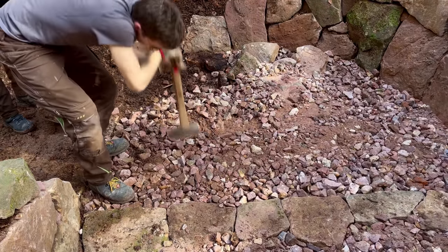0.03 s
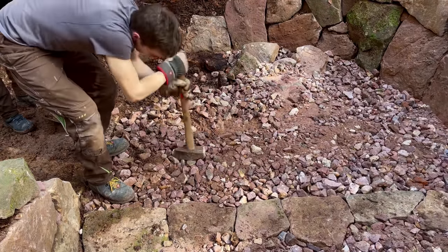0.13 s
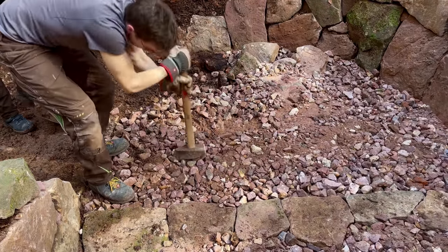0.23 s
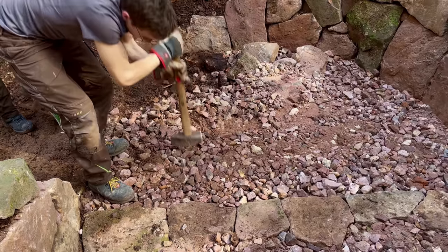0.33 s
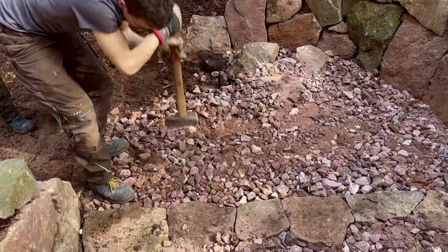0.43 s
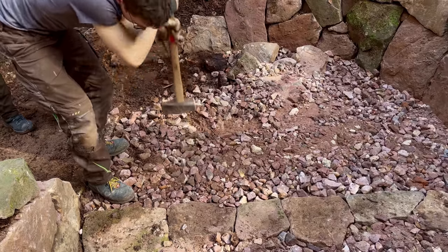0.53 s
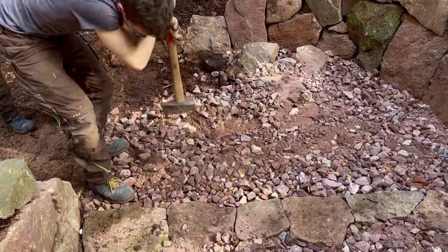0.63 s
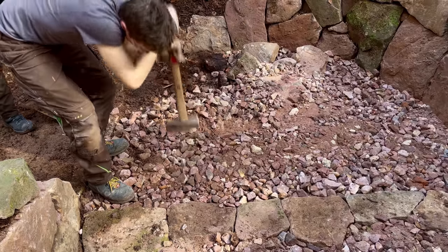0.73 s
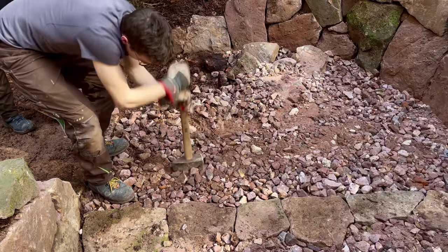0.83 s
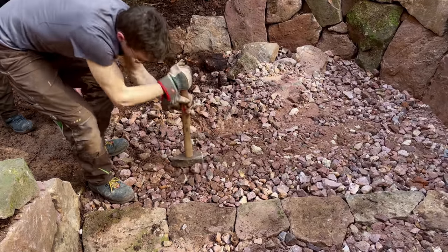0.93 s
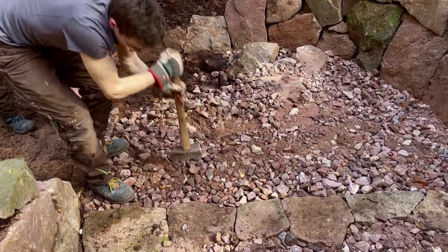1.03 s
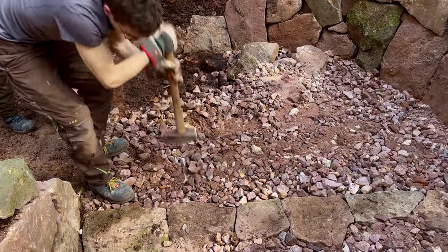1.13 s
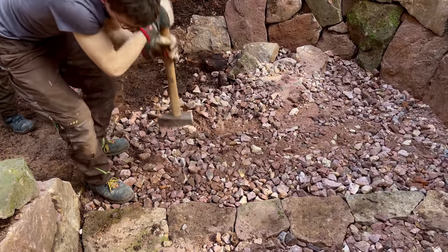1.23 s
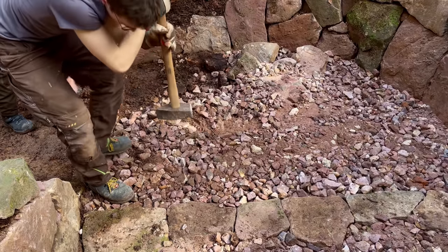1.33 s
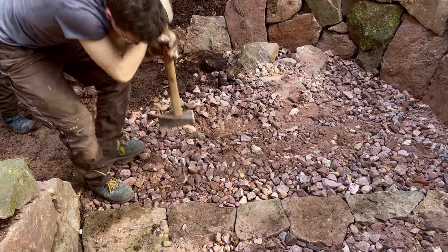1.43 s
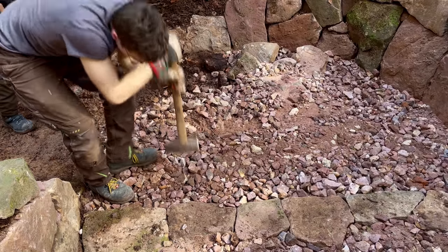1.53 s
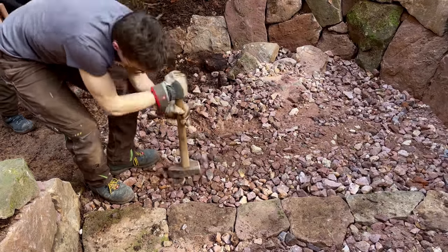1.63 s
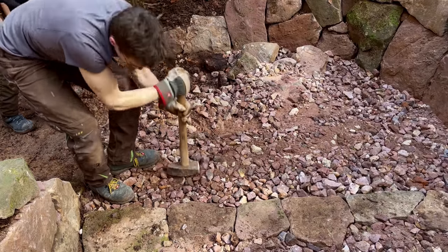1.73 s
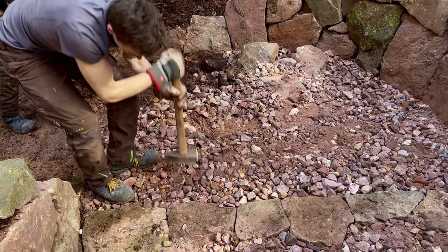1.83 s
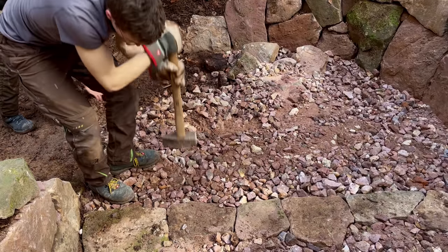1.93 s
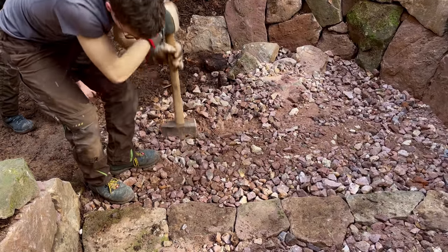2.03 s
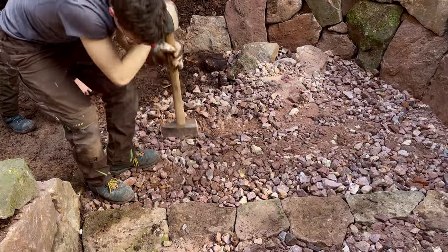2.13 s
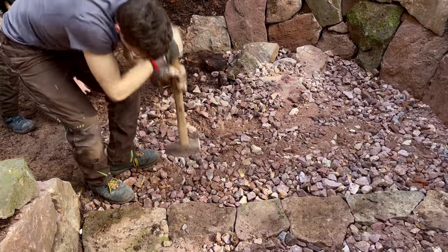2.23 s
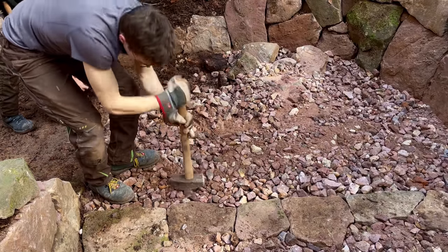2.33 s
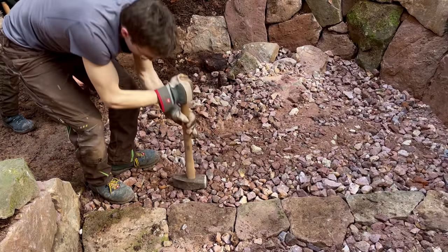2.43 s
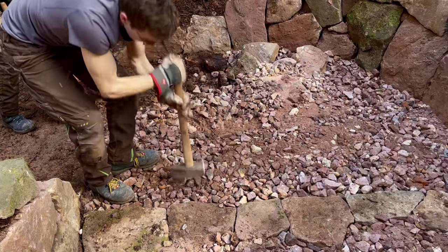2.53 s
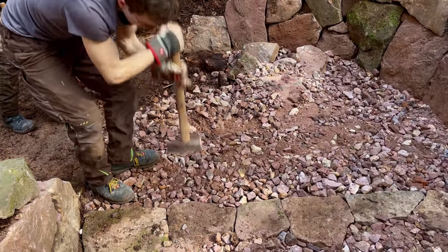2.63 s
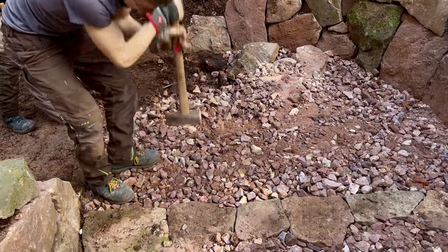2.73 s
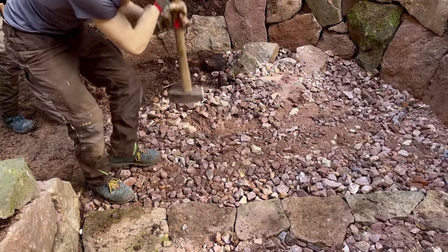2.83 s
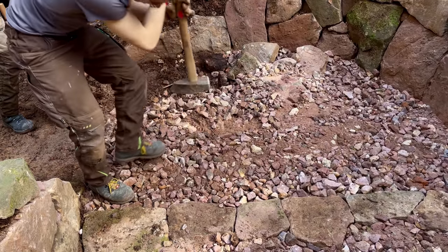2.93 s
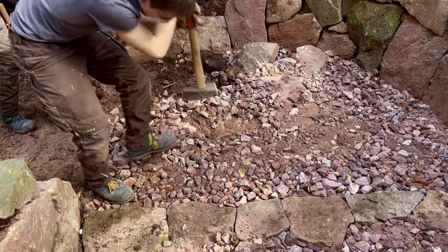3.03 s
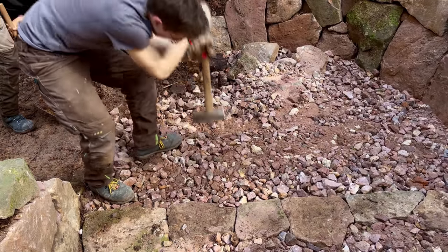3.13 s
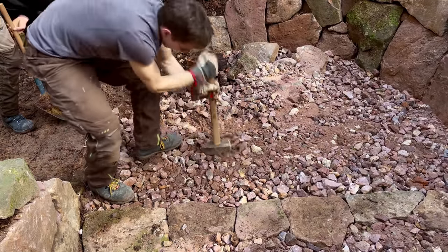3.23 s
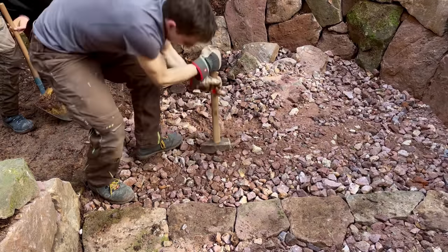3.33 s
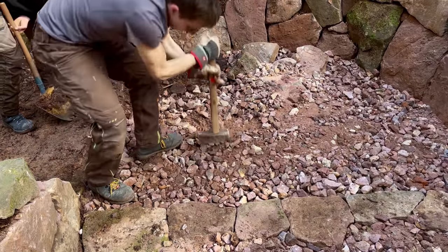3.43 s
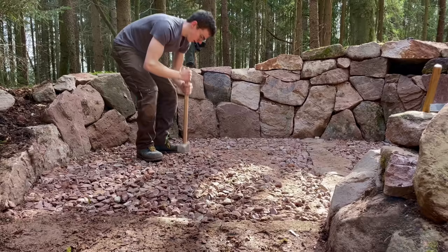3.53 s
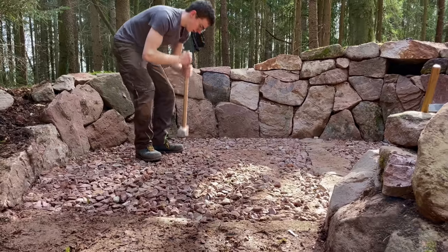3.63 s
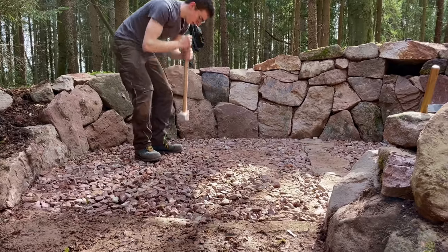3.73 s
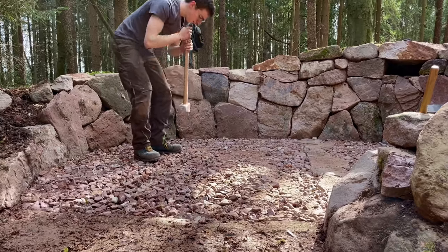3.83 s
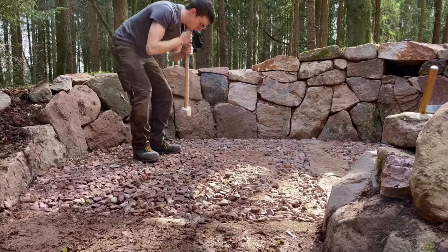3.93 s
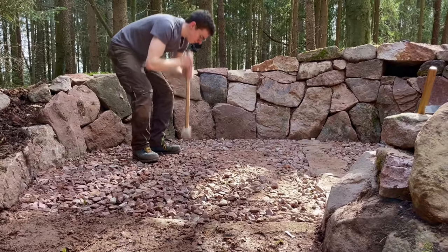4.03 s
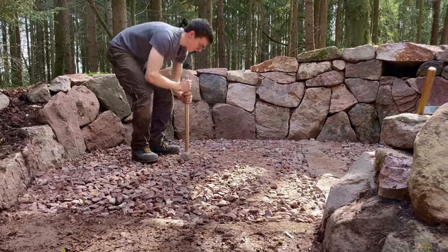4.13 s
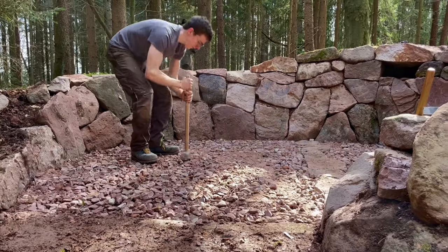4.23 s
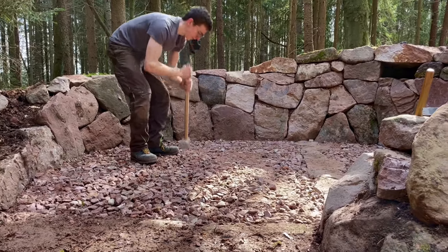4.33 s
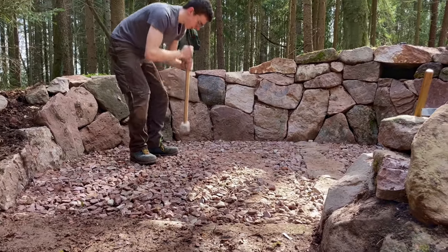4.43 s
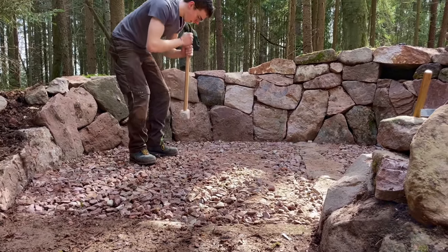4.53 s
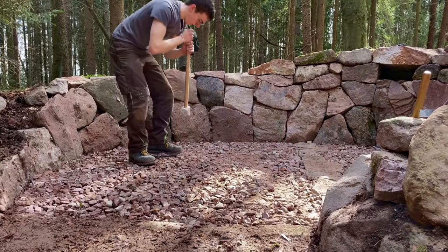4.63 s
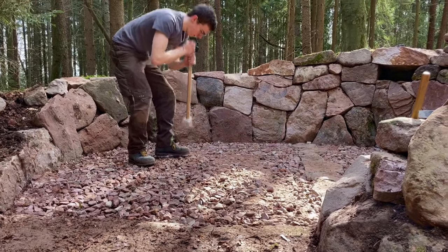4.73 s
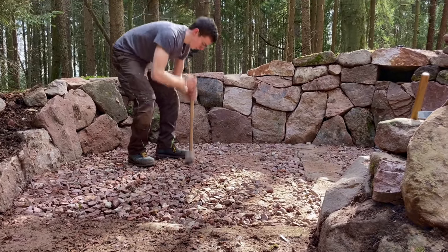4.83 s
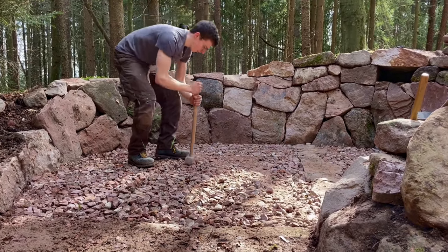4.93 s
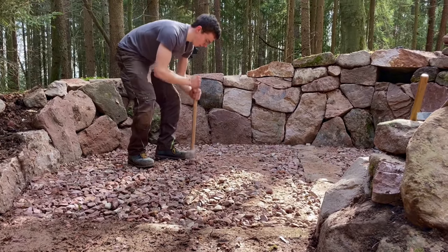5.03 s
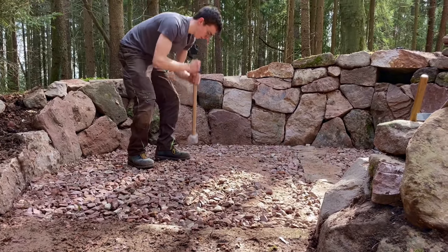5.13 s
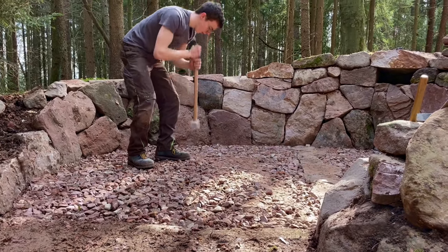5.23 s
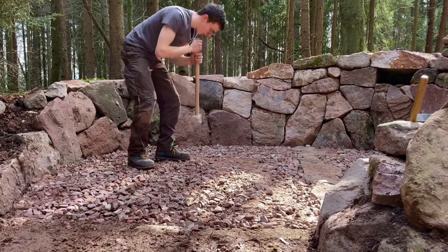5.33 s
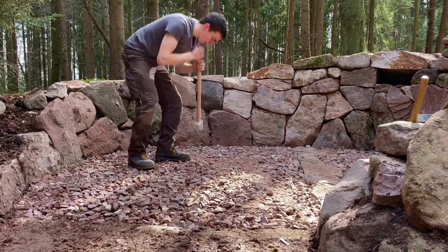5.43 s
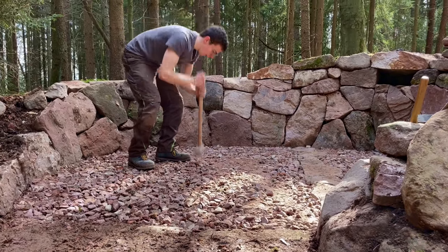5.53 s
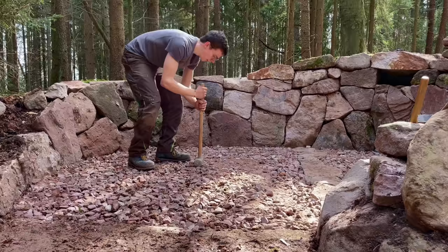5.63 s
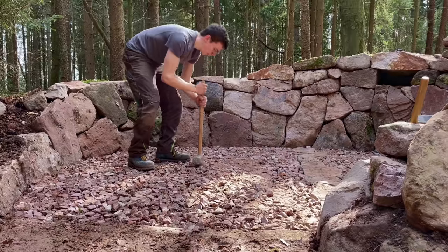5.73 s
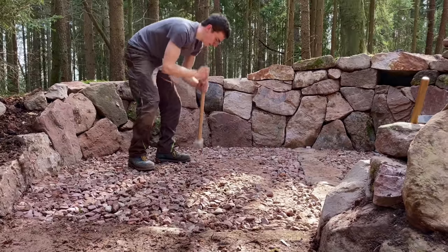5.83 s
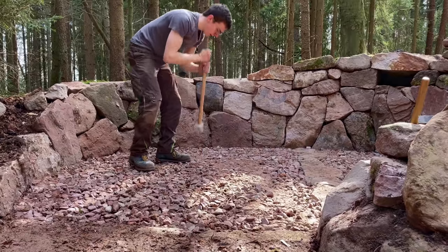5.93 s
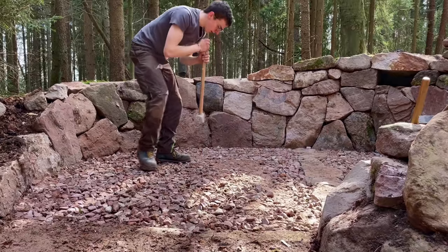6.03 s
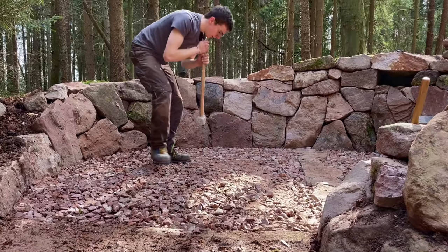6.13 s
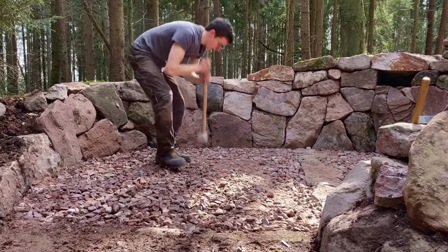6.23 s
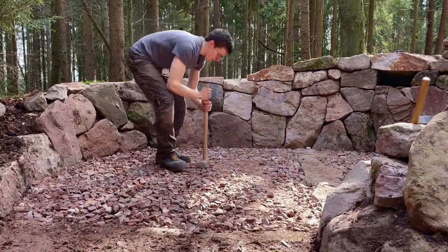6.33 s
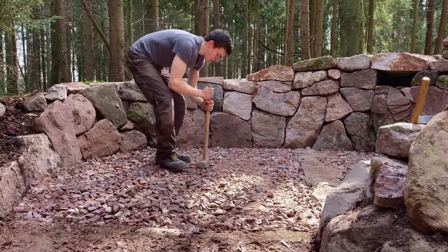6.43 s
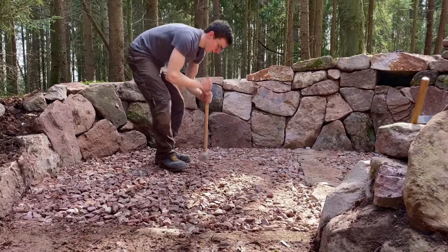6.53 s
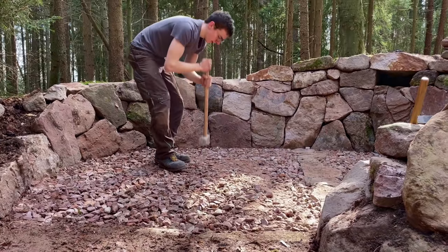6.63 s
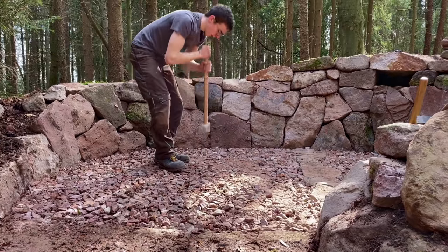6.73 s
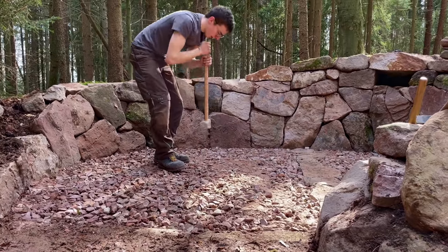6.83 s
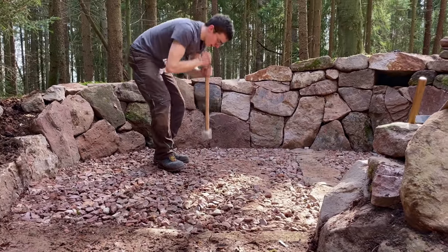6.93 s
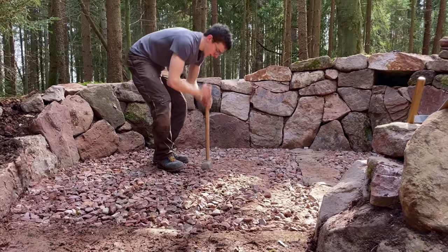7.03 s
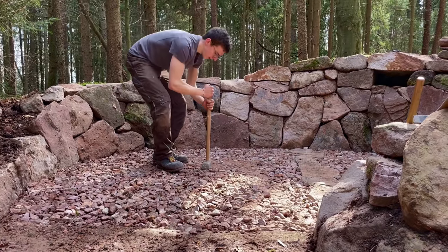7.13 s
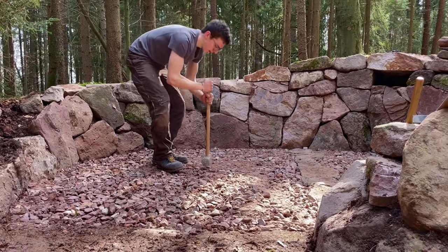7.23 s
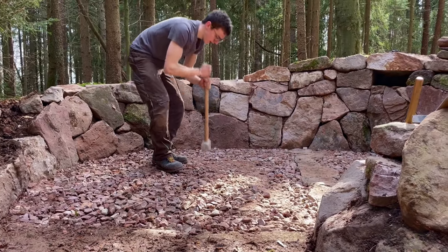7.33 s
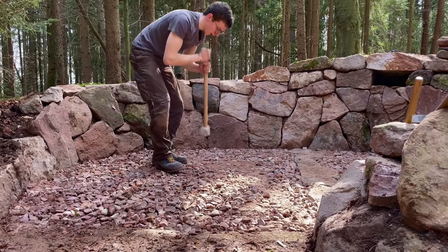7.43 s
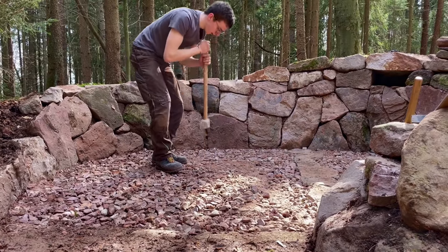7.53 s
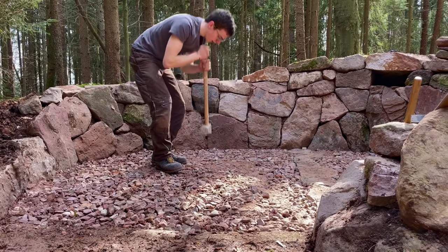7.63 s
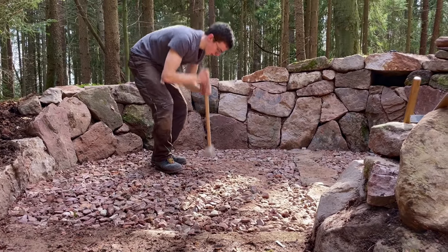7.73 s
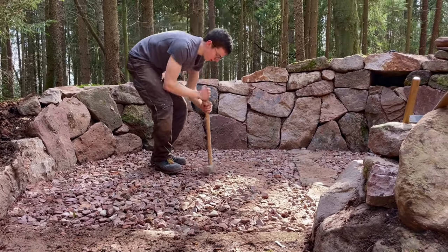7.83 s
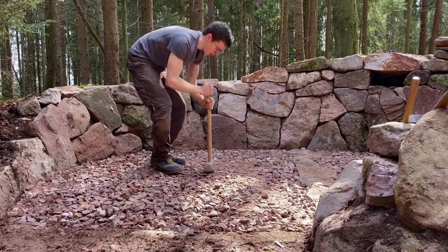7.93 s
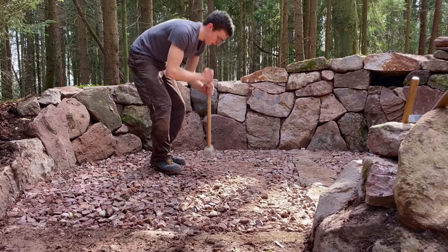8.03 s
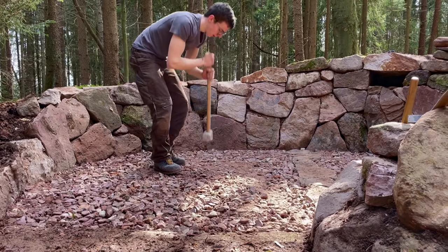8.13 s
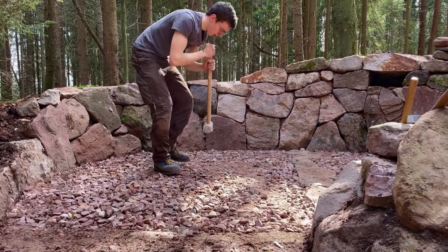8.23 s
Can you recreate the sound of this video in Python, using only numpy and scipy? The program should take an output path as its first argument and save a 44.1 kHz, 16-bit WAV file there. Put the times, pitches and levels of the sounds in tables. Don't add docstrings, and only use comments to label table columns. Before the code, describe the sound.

A quiet forest clearing inside a low stone wall. Gravel stirs briefly, then a heavy steel tamper slams into loose stones at 0.1 s, and again at about 0.9, 1.6, 2.4 and 3.3 s, close to the microphone. Each hit is a hard, bright crack of breaking stones and crushed grit, with a faint high steel ring, clearest on the second, and a deep thud near 57 Hz. Pebbles tick and clink around 0.5 s; boots scuff and thump near 1.5 and 3.1 s. A small bird chirps and whistles at 2.8-3.55 s. From about 3.6 s the blows are farther away, their bass lighter: 4.1, 4.9, 5.6, 6.3, 7.1 and 7.8 s, with boot thumps around 4.7 and 6.3 s. A faint distant bird calls at 1.3 and 7.3 s. Every blow leaves a soft, patchy, short wash from trunks and walls, over a barely audible low rumble.

```python
import sys
import numpy as np
from scipy import signal
from scipy.fft import rfft, irfft, next_fast_len
from scipy.io import wavfile
from scipy.ndimage import uniform_filter1d

SR = 44100
rng = np.random.default_rng(int(sys.argv[2]) if len(sys.argv) > 2 else 0)


def boost(x):
    u = np.asarray(x, float) / 20
    return 10 ** u


def output_pcm(signal):
    pcm = np.clip(np.atleast_2d(signal).T, -1, 1) * 32767
    wavfile.write(sys.argv[1], SR, np.round(pcm).astype(np.int16))


N = 366030
FAR_FROM_S = 3.6

# start_s, grit_brightness_db, dull_rattle_db, settling_stones_db, trees_reply_db
BLOWS = [(.130, -1, -18, -47, -45), (0.872, 1, -14, -58.5, -44), (1.634, -7, -21, -60.5, -44),
         (2.362, -2, -22.5, -66, -46), (3.257, 1.5, -18, -52, -43), (4.116, -1.5, -18.5, -56, -48),
         (4.868, -1.5, -12, -68, -45.5), (5.588, -7, -23.5, -63, -46), (6.335, -12, -21, -48, -42),
         (7.063, 0.5, -10, -71.5, -49.5), (7.808, 0.5, -29, -52, -50.5)]
# deepest_trough_s, slow_wave_db, quick_wave_lead_ms, quick_wave_db
THUDS = [(0.1593, -15.5, 14.5, -34), (0.901, -14.5, 11.6, -27.5), (1.6649, -13, 17.4, -18),
         (2.389, -15, 10.4, -11.5), (3.288, -13, 18.5, -22), (4.1463, -20.5, 12.8, -21),
         (4.899, -19, 11, -15), (5.619, -20, 12.7, -18), (6.3653, -20.5, 12.9, -17),
         (7.0931, -20, 13.3, -23), (7.8381, -19.5, 13, -23.5)]
# frequency_hz, density_db (per Hz)
DULL = [(53, -32.5), (90, -2.5), (319, -3), (568, -5.5), (768, -10), (1160, -17), (1530, -18), (1800, -24),
        (2340, -49.5), (3960, -120)]


def at_hz(points, hz):
    points = np.array(points, float)
    return np.interp(np.log(hz + 1), np.log(points[:, 0] + 1), points[:, 1])


def coloured(x, spectrum):
    size = next_fast_len(x.shape[-1] + 4096)
    gain = boost(at_hz(spectrum, np.fft.rfftfreq(size, 1 / SR)))
    gain = gain / np.sqrt(np.mean(gain ** 2))
    return irfft(rfft(x, size) * gain, size)[..., :x.shape[-1]]


def add(track, s, piece):
    k = max(round(s * SR), 0)
    track[k:k + len(piece)] += piece[:N - k]


def drift(rate):
    slow = uniform_filter1d(rng.standard_normal(N // 64 + 2), max(int(SR / 128 / rate), 1))
    return np.interp(np.arange(N) / 64, np.arange(len(slow)), slow / slow.std())


def grains(per_s, spread_db, alike):
    hits = rng.random(N) < per_s / SR
    sizes = boost(spread_db * np.minimum(rng.exponential(1, N), 4)) * hits
    mid, side = rng.standard_normal((2, N)) * (1 + sizes)
    side = signal.lfilter(*signal.butter(2, 5000, fs=SR), side)
    alike = np.clip(alike, 0, 1)
    out = np.sqrt(1 + alike) * mid + np.sqrt(1 - alike) * side * [[1], [-1]]
    return out / out.std()


def stones(per_s, spread_db, cycles, hiss, alike):
    hits = rng.random(N) < per_s / SR
    sizes = boost(spread_db * np.minimum(rng.exponential(1, N), 3))
    clicks = sizes * hits * rng.choice([-1, 1], N)
    pitches, dealt = np.geomspace(500, 15000, 18), rng.integers(0, 18, N)
    out = 0
    for k, hz in enumerate(pitches):
        r, w = boost(-60 * hz / (cycles * SR)), 2 * np.pi * hz / SR
        rung = signal.lfilter([1, 0, -1], [1, -2 * r * np.cos(w), r * r], clicks * (dealt == k) + 1e-18)
        out = out + rung / rung.std() * np.sqrt(hz)
    out = out / out.std() + hiss * grains(0, 0, alike)
    return out / out.std()


def rumble():
    # frequency_hz, density_db (per Hz)
    lows = [(12, -49), (20, -24.5), (46, 6), (70, 3.5), (107, -2), (264, -25.5), (289, -33.5), (400, -23),
            (520, -49), (880, -120)]
    tremble_db, tremble_t60_s = -38, 1.9
    level, t = boost(-70 + 3 * drift(2.8)), np.arange(SR) / SR
    for s, slow_db, *_ in THUDS:
        tremble = boost(slow_db + tremble_db - 60 * t / tremble_t60_s)
        add(level, s, tremble * np.minimum(t / .03, 1))
    return level * coloured(grains(0, 0, 0.97), lows)


def shifting():
    # dull_db, gritty_db
    rest = [
        (-70, -84),
        (-71.5, -86),
    ]
    # start_s, length_s, dull_db, gritty_db
    shifts = [(.0, 0.59, -72, -76.5), (0.619, 0.18, -71, -69), (0.91, 0.34, -66.5, -66),
              (1.203, 0.64, -62, -70.5), (1.699, 0.3, -73, -74.5), (2.552, .3, -73.5, -68),
              (2.838, 0.281, -74, -73), (3.088, 0.35, -62.5, -64), (3.22, 0.336, -66, -59.5),
              (4.205, 0.32, -83.5, -75.5), (4.67, 0.22, -61.5, -67), (5.05, 0.16, -72.5, -79.5),
              (5.756, 0.24, -69.5, -67.5), (6.7, 0.094, -92, -71), (7.249, 0.34, -83, -93),
              (7.948, 0.22, -84, -77.5)]
    rise_s, fall_s = .07, .04
    lean_s, lean_dull_db, lean_grit_db = .12, -66, -67.5
    settle_t60_s, settle_dull_db = 0.53, -4
    t = np.arange(SR) / SR
    spot = (np.arange(N) > FAR_FROM_S * SR).astype(int)
    dull, grit = boost(np.transpose(rest))[:, spot]
    leans = [(s - lean_s, lean_s, lean_dull_db, lean_grit_db) for s, *_ in BLOWS]
    for s, length, dull_db, grit_db in [*shifts, *leans]:
        shape = np.clip(np.minimum(t / rise_s, (length - t) / fall_s + 1), 0, 1) ** 2
        add(dull, s, boost(dull_db) * shape)
        add(grit, s, boost(grit_db) * shape)
    for s, _, _, settle_db, _ in BLOWS:
        settle = boost(settle_db - 60 * t / settle_t60_s)
        add(dull, s, boost(settle_dull_db) * settle)
        add(grit, s, settle)
    return dull, grit


def gravel():
    # frequency_hz, density_db (per Hz)
    grit_colour = [(350, -41.5), (600, 0), (1580, -5.5), (2100, -2), (5300, -6.5), (7000, -10.5),
                   (8200, -7.5), (11200, -11), (14500, -11.5), (16300, -18.5), (17000, -33)]
    # start_s, dull_db, gritty_db, length_s, knock_pitch_hz
    boots = [(1.058, -42.5, -57, 0.0095, 338), (1.458, -40, -58, 0.0067, 389), (1.561, -42, -56, .05, 272),
             (2.425, -45, -35, 0.03, 400), (3.138, -44, -49, 0.0076, 252), (3.15, -47, -48.5, 0.03, 246),
             (3.212, -59, -49, 0.18, 743), (3.37, -48, -43, 0.013, 250), (3.383, -45, -38.5, 0.012, 252),
             (3.506, -57, -37, 0.0035, 400), (3.525, -40.5, -68, 0.0067, 222),
             (3.646, -49.5, -61, 0.028, 301), (4.481, -45.5, -71, .014, 330), (4.709, -54, -58, .014, 503),
             (4.718, -50, -58.5, 0.023, 477), (4.791, -47, -63, 0.019, 376),
             (5.513, -57.5, -64.5, 0.049, 348), (5.971, -54, -51.5, 0.045, 283),
             (6.275, -45, -54.5, 0.15, 400)]
    # start_s, grit_db, pitch_hz, length_s, stone_over_grit_db
    pebbles = [(0.517, -47.5, 4040, 0.04, -3), (0.53, -49, 5200, 0.03, 3), (0.61, -60.5, 2220, 0.013, -1),
               (0.639, -73, 10000, 0.032, 17), (1.131, -63, 5780, .008, 9), (1.154, -49, 1210, 0.011, -2.5),
               (1.197, -54, 5600, 0.0092, -3), (1.222, -56, 6000, 0.0068, -3),
               (1.772, -60, 1480, 0.0067, 18), (2.351, -50, 2790, .03, 9.5), (2.45, -53.5, 5240, .012, 2),
               (2.678, -57, 3000, 0.17, -6), (3.457, -29, 2290, 0.0027, 7.5),
               (3.638, -54.5, 2480, 0.0081, 11.5), (4.475, -52.5, 2200, 0.0083, 4),
               (5.912, -63.5, 5320, 0.064, -0.5), (6.576, -51.5, 11000, 0.0087, -6.5)]
    # start_s, level_db
    ticks = [(0.183, -41), (.230, -43), (0.299, -55), (0.334, -50.5), (0.443, -64), (1.262, -69.5),
             (1.503, -73), (1.531, -56), (1.617, -44), (1.865, -59.5), (1.921, -56), (1.938, -65),
             (2.414, -41.5), (2.511, -47.5), (3.026, -54), (3.082, -65), (3.112, -60), (3.352, -46),
             (3.487, -50), (3.568, -54.5), (5.164, -69), (5.82, -56), (6.547, -62), (8.108, -63)]
    # start_s, level_db, pitch_hz, t60_s
    clinks = [(.517, -42.5, 1140, 0.066), (.519, -44, 673, 0.056), (.517, -44, 3250, .07),
              (.517, -44, 4700, .04), (.518, -47, 5720, .03), (7.8082, -8.5, 2210, 0.0092),
              (7.8080, -7, 5150, .004), (7.8075, -20.5, 680, .012), (3.203, -43, 870, 0.043),
              (4.476, -57.5, 3800, 0.033), (4.476, -57.5, 2900, .03), (4.8695, -15.5, 549, .015),
              (7.0705, -20, 1300, .015), (7.076, -26, 2200, .012), (6.3350, -9, 3300, .012),
              (6.337, -10, 1870, .012), (6.341, -14, 1000, .01), (4.1155, -17, 4020, .014),
              (4.1150, -15, 3000, .007), (4.1185, -14, 1150, .012), (4.123, -20, 2000, .012),
              (4.868, -13, 4090, .008), (5.589, -11, 4500, .006), (0.124, -15, 560, .014)]
    # start_s, level_db, pitch_hz, t60_s
    thumps = [(1.5605, -24, 360, .035), (1.568, -25, 290, .05), (1.570, -27, 110, .09),
              (1.585, -32, 420, .03), (3.1375, -33, 330, .04), (3.142, -29, 250, .07),
              (3.146, -25, 105, .09), (3.224, -40, 420, .03), (3.200, -38, 90, .09), (4.708, -37, 170, .06),
              (4.7185, -36, 620, .03), (4.7235, -33, 300, .035), (4.731, -38, 90, .1),
              (4.753, -41, 200, .07), (4.7905, -31, 410, .03), (4.794, -35, 150, .1),
              (4.801, -39, 520, .03), (6.2725, -30, 380, .03), (6.287, -27, 300, .045),
              (6.296, -28, 150, .07), (6.310, -27, 330, .04), (6.313, -33, 800, .03)]
    pebble_dull_db = -17
    sole_db, sole_rise_s, sole_t60_s = 3, .004, .045
    sole_start, sole_sink_s = 1.1, .005

    dull, grit = shifting()
    grit = grit * boost(2.4 * drift(13))
    tone, t = np.zeros(N), np.arange(SR // 3) / SR
    scuffs = [(s, db + pebble_dull_db, db, hz, db + stone_db, length) for s, db, hz, length, stone_db in pebbles]
    scuffs += [(s, low_db, high_db, hz, low_db - 4.5, length) for s, low_db, high_db, length, hz in boots]
    for s, low_db, high_db, hz, tone_db, length in scuffs:
        fade = np.exp(-t / np.clip(length, .002, .1) * 2) * np.minimum(t / 0.0012, 1)
        add(dull, s, boost(low_db - 4) * fade * np.minimum(t / 0.0034, 1))
        add(grit, s, boost(high_db - 2.0) * fade)
        band = signal.butter(1, [hz / 1.3, hz * 1.3], "band", fs=SR)
        stone = signal.lfilter(*band, rng.standard_normal(len(t)))
        add(tone, s, boost(tone_db) * fade * stone / stone.std())

    sinking = t + sole_start * sole_sink_s * (1 - np.exp(-t / sole_sink_s))
    for s, low_db, *_, hz in boots:
        fade = boost(low_db + sole_db - 60 * t / sole_t60_s) * np.minimum(t / sole_rise_s, 1)
        add(tone, s, fade * np.sin(2 * np.pi * hz * sinking))
    for s, db, hz, t60 in [*clinks, *thumps]:
        fade = boost(db - 60 * t / t60) * np.minimum(t * hz, 1)
        add(tone, s, fade * np.sin(2 * np.pi * hz * t))
    for s, db in ticks:
        add(grit, s, boost(db - 60 * t / 0.012))
    dull_bed = dull * coloured(grains(130, 3, 0.61), DULL)
    return dull_bed + grit * coloured(stones(2500, 5, 13, 1.0, 0.2), grit_colour) + tone


def cracks():
    # start_s, peak_db, pitch_hz, crushed_grit_against_peak_db
    breaks = [(0.1116, -40, 2094, -7), (0.1221, -12, 2300, -11), (0.1223, -9, 950, -16),
              (0.1299, -5, 2598, -11.5), (0.1303, -4, 759, -20), (0.1333, -15, 2997, -10),
              (.1475, -26, 950, -14), (.158, -26.5, 5010, -24.5), (0.859, -41, 2003, -9.5),
              (0.8696, -5, 2250, -14), (0.8713, -8.5, 2753, -14.5), (0.8722, -10, 3950, -12.5),
              (0.8708, -12, 5100, -14), (.8835, -22, 3906, -12), (1.63, -8.5, 1850, -11),
              (1.6311, -12, 683, -16), (1.6342, -10.5, 1750, -12.5), (1.6352, -1.5, 4500, -13),
              (1.6362, -9, 2700, -14), (1.634, -9.5, 5680, -14.5), (2.3571, -13, 2900, -10.5),
              (2.3595, -6.5, 2110, -14), (2.3600, -4.5, 963, -18), (2.3606, -3.5, 1395, -16.5),
              (2.3640, -9, 1300, -16), (2.3660, -8.5, 1945, -13), (3.2505, -7.5, 4800, -10),
              (3.2523, -14, 1180, -12), (3.2578, -2, 2000, -20.5), (3.2576, -10, 880, -18),
              (3.2607, -9.5, 2607, -16), (3.2660, -16.5, 1894, -11.5), (4.1156, -11, 1950, -10),
              (4.1172, -12, 740, -14), (4.8676, -4.5, 2600, -15), (4.8685, -8.5, 1440, -17),
              (4.8700, -7, 3080, -14), (4.8765, -20, 1326, -14.5), (4.8775, -19, 2294, -12.5),
              (5.5886, -0.5, 2630, -11.5), (5.5940, -12, 1322, -20.5), (5.5958, -14, 2310, -14),
              (6.3347, -4, 2190, -9), (6.3344, -4, 1570, -14), (7.0611, -16, 6600, -6.5),
              (7.0618, -16.5, 3960, -9.5), (7.0640, -17, 2420, -11.5), (7.0650, -15, 880, -12.5),
              (7.8039, -19.5, 5310, -7), (7.8082, -4, 3940, -14)]
    # frequency_hz, density_db (per Hz)
    crush = [(120, -22.5), (200, -7), (630, -5.5), (1200, -6), (3400, -6), (6200, -10.5), (8000, -12),
             (11600, -19), (14500, -22), (16300, -29.5), (17000, -54)]
    bite_s = .002
    snaps, spray, dust, rattle = np.zeros((4, N))
    t = np.arange(SR // 5) / SR
    bite = np.minimum(t / bite_s, 1)
    for s, db, hz, crush_db in breaks:
        _, bright_db, rattle_db, *_ = min(BLOWS, key=lambda blow: abs(blow[0] - s))
        fade = np.minimum(t * hz, 1) * boost(1.5 - 60 * t * hz / 10)
        add(snaps, s, boost(db + 4.0) * np.sin(2 * np.pi * hz * t) * fade)
        grit_db = db + crush_db
        add(spray, s - bite_s, boost(grit_db + 2.5 - 60 * t / 0.035) * bite ** 2.7)
        add(dust, s - bite_s, boost(grit_db + bright_db + 2.0 - 60 * t / 0.033) * bite ** 2.5)
        add(rattle, s, boost(grit_db + rattle_db - 60 * t / .1))
    grit = stones(5000, 4, 9.9, 0.53, 0.99)
    body = signal.sosfilt(signal.butter(2, 4500, fs=SR, output="sos"), grit)
    crushed = coloured(spray * body + dust * (grit - body), crush)
    return snaps + crushed + coloured(rattle * grains(500, 3.5, 0.97), DULL)


def steel():
    # pitch_hz, t60_s
    modes = [(7741, .07), (8522, .25), (9232, .08), (12370, .25), (15330, .12)]
    # start_s, then level_db of the four lower modes
    rings = [(0.131, -66, -35.5, -35.5, -61), (.871, -47.5, -24, -40, -64),
             (1.634, -60.5, -63.5, -49, -39.5), (2.362, -46, -45.5, -48.5, -67.5),
             (3.256, -75.5, -64.5, -51.5, -69.5), (4.115, -68.5, -63, -71, -61),
             (4.869, -76.5, -51, -66, -53), (5.589, -39.5, -43, -49, -43.5),
             (6.334, -36.5, -41.5, -73, -61), (7.063, -58.5, -68, -60.5, -51), (7.808, -52, -58, -64, -50)]
    out, t = np.zeros(N), np.arange(SR // 2) / SR
    for s, *levels_db in rings:
        levels_db = [*levels_db, levels_db[2] - 9.5]
        for db, (hz, t60) in zip(levels_db, modes):
            add(out, s, boost(db - 60 * t / t60) * np.sin(2 * np.pi * hz * t))
    return out


def thuds():
    # slow_hz, glide_hz_per_s, crest_after_trough_s, spread_s, quick_hz, quick_spread_s
    ground = [
        (57.3, -300, -0.012, 0.027, 125, 0.0042),
        (57, 30.5, 0.0019, 0.039, 130.5, 0.0049),
    ]
    # start_s, level_db, pitch_hz
    knocks = [(0.134, -31, 263), (0.872, -16, 300), (1.6387, -14, 225), (2.368, -21.5, 190),
              (3.259, -16.5, 270), (4.118, -21.5, 375), (4.872, -18.5, 260), (5.591, -22.5, 203),
              (6.335, -23.5, 226), (7.067, -25.5, 220), (7.813, -35.5, 190)]
    late_s, rise_s = 0.0052, .010
    knock_start, knock_sink_s = .4, 0.0033
    start, early = .03, 0.015
    out, t = np.zeros(N), np.arange(SR // 4) / SR
    after = t - start
    for s, slow_db, lead_ms, quick_db in THUDS:
        hz, glide, crest, spread, quick_hz, quick_spread = ground[int(s > FAR_FROM_S)]
        u = np.minimum(after, .06)
        turns = hz * after + glide * (u * after - u ** 2 / 2)
        hump = np.exp(-((after - crest) / spread) ** 2) + 0.37 * np.exp(-t / (0.69 * spread))
        swell = np.clip((t - late_s) / rise_s, 0, 1) ** 2 * hump
        add(out, s - start, -boost(slow_db) * swell * np.cos(2 * np.pi * turns))
        add(out, s - start, boost(slow_db - 9.5) * swell * np.sin(2 * np.pi * 36 * after))
        quick = (t / early) ** 2 * np.exp(-(t - early) / quick_spread)
        quick = quick * np.cos(2 * np.pi * quick_hz * (t - early))
        add(out, s - lead_ms / 1000 - early, boost(quick_db) * quick)
    sinking = t + knock_start * knock_sink_s * (1 - np.exp(-t / knock_sink_s))
    for s, db, hz in knocks:
        fade = np.minimum(t * hz, 1) * boost(-60 * t * hz / 7.0)
        add(out, s, boost(db + 9) * np.sin(2 * np.pi * hz * sinking) * fade)
    return out


def trees():
    # centre_hz, t60_s, level_db
    bands = [(200, 0.99, -16), (400, 0.56, -11), (800, 0.31, -2.5), (1760, .8, -6.5), (3260, 0.6, -4),
             (6000, 0.52, -8.5), (11000, 0.25, -13)]
    blows, out = np.zeros(N), 0
    for s, *_, reply_db in BLOWS:
        blows[round((s + .008) * SR)] = boost(reply_db)
    white = [grains(0, 0, 0.39), grains(0, 0, 0.34)]
    clumps = drift(45)
    rise = np.exp(-1 / (0.0035 * SR))
    for k, (hz, t60, db) in enumerate(bands):
        sos = signal.butter(2, [hz / 1.45, hz * 1.45], "band", fs=SR, output="sos")
        band = signal.sosfilt(sos, white[k % 2])
        poles = np.convolve([1, -rise], [1, -boost(-60 / (t60 * SR))])
        fade = signal.lfilter([1 - rise], poles, blows + 1e-18)
        patchy_db = 1.4 * drift(30) + 1.5 * drift(6) + 0.8 * clumps
        out = out + band / band.std() * boost(db + patchy_db) * fade
    return out


def echo(blows):
    t = np.arange(SR * 3 // 4) / SR
    fade = boost(-65 - 60 * t / .7) * np.clip(t / .02 - .4, 0, 1)
    mid, side = rng.standard_normal((2, len(t))) * fade
    sos = signal.butter(1, (560, 6000), "band", fs=SR, output="sos")
    cloud = signal.sosfilt(sos, mid + .4 * side * [[1], [-1]])
    return signal.fftconvolve(blows.mean(axis=0, keepdims=True), cloud, axes=1)[:, :N]


def bird():
    # time_s, pitch_hz, level_db
    near_notes = [
        [(2.803, 7400, -66), (2.815, 5300, -69), (2.832, 4530, -61), (2.852, 3980, -65), (2.868, 3820, -78)],
        [(2.95, 3940, -75), (2.962, 4360, -66), (3.005, 4594, -50), (3.045, 4700, -61), (3.115, 4910, -54),
         (3.138, 4750, -80)],
        [(3.40, 4730, -70), (3.42, 4750, -68), (3.47, 4780, -61), (3.51, 4760, -65), (3.53, 4950, -66),
         (3.56, 4850, -72)],
    ]
    # time_s, pitch_hz, level_db
    far_notes = [
        [(7.25, 2250, -82), (7.34, 2100, -76), (7.43, 1950, -76.5), (7.55, 1880, -80)],
        [(1.25, 1900, -74), (1.36, 1900, -68.5), (1.45, 1850, -79)],
    ]
    echo_db, echo_t60_s = -7.5, .25
    out = np.zeros((2, N))
    for k, note in enumerate([*near_notes, *far_notes]):
        s, hz, db = np.transpose(note)
        t = np.arange(s[0], s[-1], 1 / SR)
        far = int(k >= len(near_notes))
        waver = np.cumsum(rng.standard_normal(len(t))) * (.034 + .15 * far)
        edges = np.clip(np.minimum(t - s[0], s[-1] - t) / 0.0053, 0, 1)
        level = np.sqrt(2) * boost(np.interp(t, s, db) + 2 * drift(40)[:len(t)])
        phase = 2 * np.pi * np.cumsum(np.interp(t, s, hz)) / SR + waver
        add(out[far], s[0], level * edges * np.sin(phase))
    t = np.arange(SR // 3) / SR
    wood = rng.standard_normal((2, len(t))) * boost(-60 * t / echo_t60_s) * np.minimum(t / .01, 1)
    wood = wood / np.sqrt(np.sum(wood ** 2, axis=1, keepdims=True))
    blur = signal.fftconvolve([boost(echo_db) * out[0] + out[1]], wood, axes=1)[:, :N]
    return out[0] * boost(np.array([[3], [-3]])) + blur


def scene():
    blows = cracks()
    tamper = blows + steel() + thuds()
    replies = boost(-1.5) * trees() + echo(blows)
    return rumble() + gravel() + tamper + replies + bird()


def low_pass(x):
    return signal.sosfilt(signal.butter(12, 16850, fs=SR, output="sos"), x)


def record(dry):
    # frequency_hz, lead_radians
    port_phase = [(0, 0), (3000, .8), (5200, 1.1), (6400, -.8), (7400, -2.2), (8250, -3.14), (9100, -4.2),
                  (11800, -6.28), (13200, -7.9), (14900, -9.42), (16500, -11.2)]
    # frequency_hz, difference_db
    port_tilt = [(60, 0), (200, .3), (700, 1.2), (2400, 2.4), (5000, 3.6), (8200, 0), (15000, 0)]
    size = next_fast_len(N + 4096)
    hz = np.fft.rfftfreq(size, 1 / SR)
    half = boost(at_hz(port_tilt, hz) / 2) * np.exp(.5j * np.interp(hz, *np.transpose(port_phase)))
    ports = irfft(rfft(dry, size) * [half, 1 / half], size)[:, :N]
    rounded = 1.069 * np.tanh(ports / 1.156)
    mix = signal.sosfilt(signal.cheby2(10, 60, 17100, fs=SR, output="sos"), rounded)
    return low_pass(mix)


dry = scene()
out = record(dry)
output_pcm(out)
```